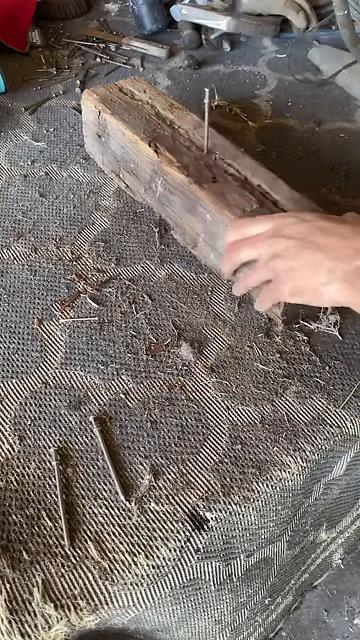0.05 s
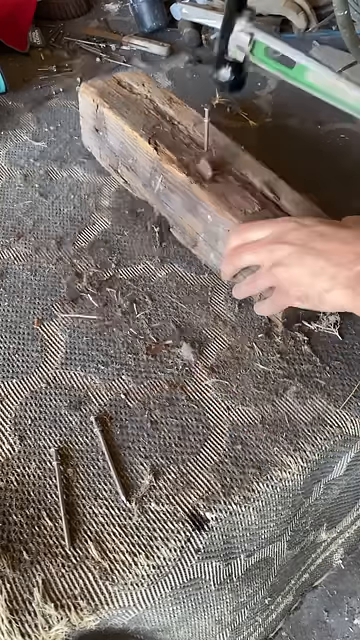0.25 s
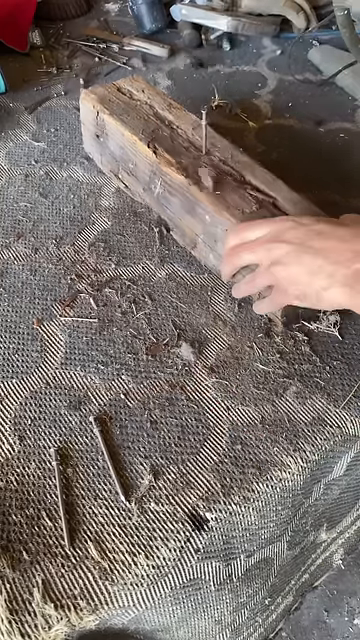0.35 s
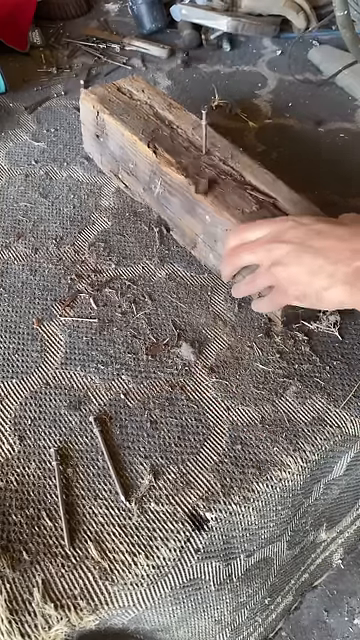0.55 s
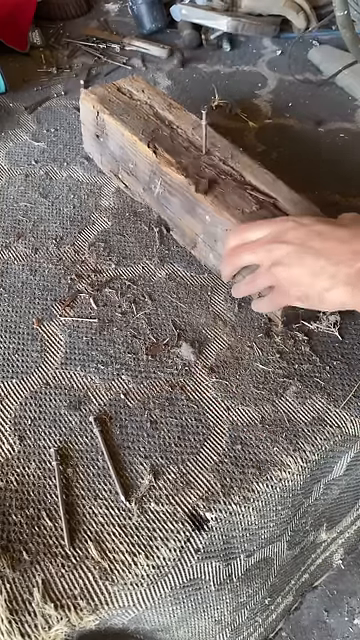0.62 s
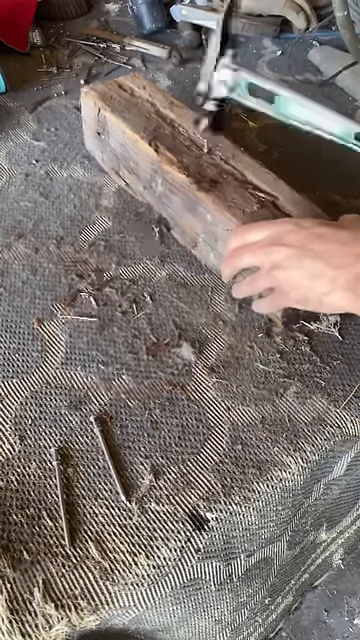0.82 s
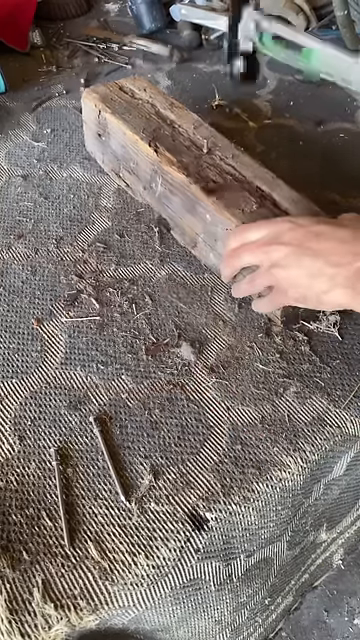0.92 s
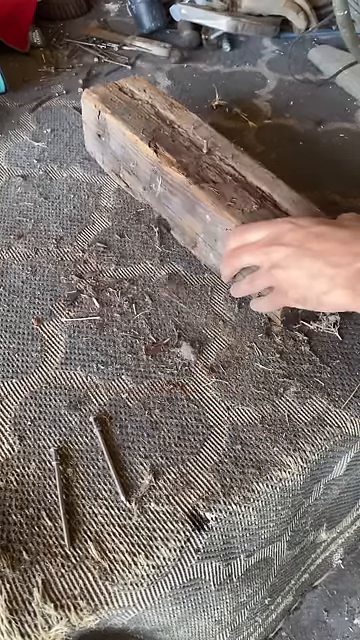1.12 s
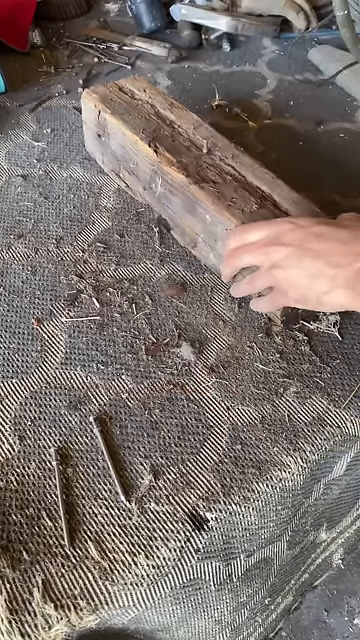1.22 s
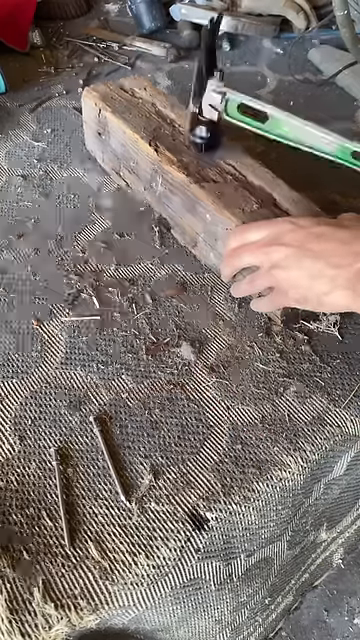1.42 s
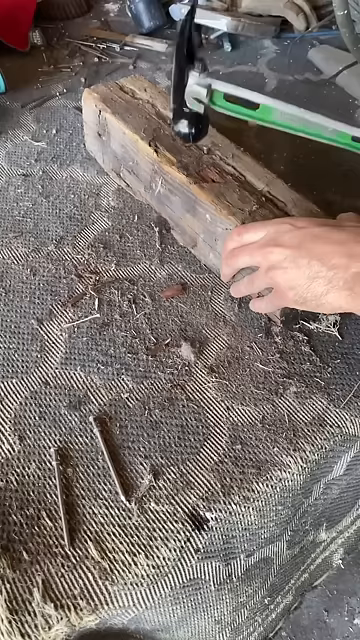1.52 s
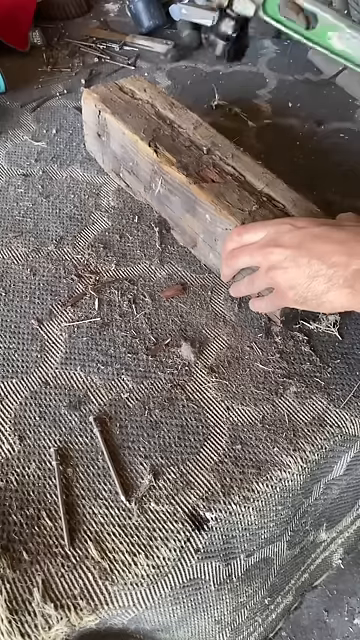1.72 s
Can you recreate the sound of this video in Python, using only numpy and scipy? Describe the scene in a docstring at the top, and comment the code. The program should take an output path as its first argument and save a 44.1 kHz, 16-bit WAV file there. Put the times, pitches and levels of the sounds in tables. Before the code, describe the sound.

A hammer hits a nail into a wooden block three times, at about 0.2, 0.8 and 1.4 seconds, close by in a quiet workshop. Each blow is a sharp steel crack with a wooden knock, a low bench boom and a brief room ring. Loose nails jingle faintly near 0.4 and 1.0 seconds, cloth swishes softly between swings, and things on the bench settle around 1.6 seconds.

```python
"""A workshop, close to a cloth-covered bench: a hammer drives a nail into a wooden block, three blows.
Each blow is a short scuff, a steel crack, a knock of the block and a boom of the bench;
the room rings after it. Loose nails jingle, things on the bench settle, a chip ticks.
The hand scrapes the block and the arm swishes faintly over the quiet of the room."""
import sys
import numpy as np
from scipy import signal
from scipy.fft import rfft, irfft
from scipy.io import wavfile
from scipy.ndimage import uniform_filter1d

SR = 44100
rng = np.random.default_rng(int(sys.argv[2]) if len(sys.argv) > 2 else 0)


def wav_record(signal):
    """Record a signal, one row per channel, as 16-bit PCM in the file named by sys.argv[1]."""
    frames = np.transpose(np.atleast_2d(signal))
    bounded = np.clip(frames, -1, 1)
    # unit amplitude maps onto the largest positive 16-bit level
    quanta = np.round(bounded * 32767).astype(np.int16)
    wavfile.write(sys.argv[1], SR, quanta)


N = 77175
T, HZ = np.arange(N) / SR, np.fft.rfftfreq(N, 1 / SR)
TOP_HZ = 16400
MIC_DELAY_S = np.array([[0], [0.00002]])  # left, right
# microphone pair (frequency [Hz], correlation [-1..1], left minus right [dB])
MIC_PAIR = [(100.4, 0.94, 0.1), (280, 1, -2.9), (652, 0.17, 0.5), (1494, 0.2, 1), (2880, 0.07, 2),
            (5520, 0, -1), (10300, 0.14, 0.5), (15140, -0.1, -2.3)]


def amp(db):
    """Decibels to gain."""
    return 10 ** (np.asarray(db) / 20)


def read(table, hz, column=1):
    """Table column interpolated over log frequency."""
    columns = np.transpose(table)
    return np.interp(np.log(hz + 1), np.log(columns[0] + 1), columns[column])


def add(mix, start_s, sound):
    """Mix a sound in at start_s."""
    part = mix[:, round(start_s * SR):][:, :sound.shape[1]]
    part += sound[:, :part.shape[1]]


def noise(spectrum, tilt_db_oct=0):
    """Partly correlated stereo noise: shaped, scaled to unit rms, then tilted above 500 Hz."""
    a, b = rfft(rng.standard_normal((2, N)))
    correlation = np.clip(read(MIC_PAIR, HZ), -1, 1)
    mid, side = a * np.sqrt((1 + correlation) / 2), b * np.sqrt((1 - correlation) / 2)
    colour = amp(read(spectrum, HZ))
    colour /= np.sqrt(np.mean(colour ** 2))
    colour *= amp(tilt_db_oct * np.log2(np.maximum(HZ, 500) / 500))
    return irfft(np.array([mid + side, mid - side]) * colour * (HZ < TOP_HZ), N)


def burst(spectrum, db, decay_s):
    """Noise with sudden onset and exponential decay."""
    return amp(db) * noise(spectrum) * np.exp(-T / decay_s)


def ring(modes, gain_db=0, rise_cycles=0.4, delay_500hz_s=0):
    """Struck modes; low ones build up more slowly and, if delayed, arrive later."""
    t, out = T - MIC_DELAY_S, np.zeros((2, N))
    for k, ((hz, db, t60_s), extra_db) in enumerate(zip(modes, gain_db + np.zeros(len(modes)))):
        age_s = np.maximum(t[:, :int(2 * t60_s * SR)] - delay_500hz_s * np.sqrt(500 / hz), 0)
        rise = 1 - np.exp(-age_s * hz / rise_cycles)
        fall = amp(db + extra_db - 60 * age_s / t60_s)
        out[:, :age_s.shape[1]] += (-1) ** k * fall * rise * np.sin(2 * np.pi * hz * age_s)
    return out


def room_tone():
    """Steady quiet of the workshop; a low rumble dies away at the start."""
    # spectra (frequency [Hz], density [dB])
    floor = [(25, -12), (60, 0), (140, -5), (250, -16), (450, -23), (1000, -31), (3000, -30), (5500, -32),
             (7500, -46), (10000, -39), (16000, -48)]
    rumble = [(25, -11), (60, -1), (140, -8), (250, -17.5), (500, -24.5), (1200, -33), (4000, -26.5),
              (8000, -46), (16000, -55)]
    return amp(-54) * noise(floor) + burst(rumble, db=-47.5, decay_s=0.27)


def arm():
    """Cloth swishes as the arm swings; the block scrapes once under the hand."""
    # swings (centre [s], sigma [s], level [dB])
    swings = [(0.23, 0.052, -51), (0.501, 0.039, -51.5), (0.756, 0.1, -54), (0.982, 0.084, -54),
              (1.316, 0.12, -62)]
    # spectra (frequency [Hz], density [dB])
    cloth = [(300, -4), (1200, -10), (2600, 1), (5000, -2), (7500, -22), (10000, -9.5), (16000, -23.5)]
    scrape = [(3500, -26), (4400, 0), (5000, -3), (6000, -30)]

    def swell(centre_s, sigma_s, db):
        return amp(db) * np.exp(-((T - centre_s) / sigma_s) ** 2 / 2)

    swishes = noise(cloth) * sum(swell(*swing) for swing in swings)
    return swishes + noise(scrape) * swell(centre_s=0.12, sigma_s=0.022, db=-56.5)


def scuff(length_s, db):
    """Grainy scuff swelling into the crack."""
    # spectrum (frequency [Hz], density [dB])
    spectrum = [(100, -6), (500, 4), (1200, 0.5), (2500, -3), (6000, -14.5), (10000, -26), (16000, -32.5)]
    size, grain_db = round(length_s * SR), 4.5
    grains = uniform_filter1d(rng.standard_normal(N), size=40)
    swell = np.linspace(0, 1, size) ** 0.89
    return swell * (amp(db + grain_db * grains / grains.std()) * noise(spectrum))[:, :size]


def crack(blow, db):
    """Steel hits steel."""
    # spectra (frequency [Hz], density in blow 0, 1, 2 [dB])
    spectra = [(502, -12, 1, -7.5), (1850, 5, 1, 17.5), (2950, -10, 7, -23), (5400, 9, -9, -12.5),
               (7000, -5.5, -9, -36), (9700, -14.5, 9, 1.5), (10260, 17.5, -10, 1.5), (11900, -17, 4, -7),
               (13300, -5, -5, 4), (15970, -2, 3.5, 2)]
    return burst(np.array(spectra)[:, [0, blow + 1]], db, decay_s=0.00069)


def rasp(db, decay_s):
    """The nail rasps through wood fibres."""
    # spectrum (frequency [Hz], density [dB])
    fibres = [(200, -12.5), (700, 8.5), (1800, 6), (3000, -6.5), (5000, 1.5), (7500, -27.5), (10500, 4),
              (13000, -27), (16000, -14)]
    return burst(fibres, db, decay_s)


def steel_ring(db, shank_hz, shimmer_db):
    """Head and nail ring, the free shank only briefly; the head shimmers on."""
    # modes (frequency [Hz], level [dB], t60 [s])
    head_and_nail = [(2410, -30.5, 0.45), (3075, -41, 0.075), (3795, -51.5, 0.45), (9280, -45.5, 0.3),
                     (10900, -30.5, 0.051)]
    shimmer = [(969, -43, 0.6), (3795, -63, 1.0), (9060, -62, 1.3), (9216, -60, 1.3), (9400, -65, 1.2),
               (9630, -63, 1.2)]
    shank = [(shank_hz, -16, 0.0076)]
    return amp(db) * ring(head_and_nail) + ring(shank) + amp(shimmer_db) * ring(shimmer)


def bending_wave(colour, travel_s):
    """First wave through block and bench; delay goes as 1/sqrt(frequency), so it sweeps down."""
    # spectrum (frequency [Hz], density [dB])
    spectrum = [(20, -30.5), (60, -11.5), (100, 3), (180, 3.5), (300, -7.5), (600, -11.5), (1000, -17),
                (1800, -33.5), (3500, -45), (8000, -67)]
    phase_turns = 2 * travel_s * np.sqrt(500 * HZ) + HZ * MIC_DELAY_S
    magnitude = amp(36 + read(spectrum, HZ) + read(colour, HZ))
    return irfft(magnitude * np.exp(-2j * np.pi * phase_turns), N)[:, :SR // 10]


def block_knock(colour, travel_s):
    """The block's modes start partway through the bending wave's travel."""
    # modes (frequency [Hz], level [dB], t60 [s])
    modes = [(173.2, -4.5, 0.084), (237, -14.5, 0.054), (320, -30, 0.017), (406, -27.5, 0.019),
             (437, -48.5, 0.21), (504.3, -20, 0.094), (591, -11.5, 0.061), (660, -11.5, 0.028),
             (888, -27.5, 0.035), (957, -23.5, 0.066), (1128, -18.5, 0.026), (1564, -27.5, 0.03),
             (1706, -12, 0.022), (2896, -23, 0.028)]
    return ring(modes, read(colour, np.transpose(modes)[0]), delay_500hz_s=0.614 * travel_s)


def bench_boom(db):
    """Low modes of the bench."""
    # modes (frequency [Hz], level [dB], t60 [s])
    modes = [(57.7, -15, 0.16), (92.1, -9, 0.068), (109.9, -21.5, 0.18)]
    return amp(db) * ring(modes)


def standing_waves(db):
    """Room modes build up slowly and hum on."""
    # modes (frequency [Hz], level [dB], t60 [s])
    modes = [(60.1, -25.5, 0.7), (68.6, -19, 1), (171, -35, 0.89)]
    return amp(db) * ring(modes, rise_cycles=38)


def echoes(near_db, far_db, tilt_db_oct):
    """Dense reflections rise, sag during a hold, then decay at a rate set by frequency."""
    # reverberation (frequency [Hz], density [dB], t60 [s])
    near = [(40.3, -5, 0.17), (151, 4, 0.17), (385, -4, 0.52), (930, -12.5, 0.21), (2420, -18, 0.37),
            (6210, -22, 0.29), (7530, -59, 0.12), (8600, -23.5, 0.27), (12200, -25.5, 0.24),
            (13500, -33, 0.23), (16000, -32.5, 0.31)]
    far = [(29.8, -8, 2.1), (63.6, 0.5, 1.9), (133, 0, 0.85), (269, -4.5, 0.81), (509, -8, 0.72),
           (1270, -20.5, 0.61), (4520, -29, 0.29), (6100, -36.5, 1.1), (7800, -75, 0.5),
           (8250, -37.5, 0.94), (12000, -44, 1.4), (16000, -55, 0.48)]

    def tail(bands, db, rise_s, hold_s, sag_db_per_s):
        hz, t, frames = signal.stft(noise(bands, tilt_db_oct), SR, nperseg=512)
        t60_s = read(bands, hz, column=2)[:, None]
        frames *= amp(db - sag_db_per_s * np.minimum(t, hold_s) - 60 * np.maximum(t - hold_s, 0) / t60_s)
        return signal.istft(frames, SR, nperseg=512)[1][:, :N] * (1 - np.exp(-T / rise_s))

    return (tail(near, near_db - 15.5, rise_s=0.0022, hold_s=0.064, sag_db_per_s=108.5)
            + tail(far, far_db - 28, rise_s=0.087, hold_s=0.23, sag_db_per_s=20.5))


def hammer():
    """Each blow excites nail, block, bench and room."""
    # blows (time [s], scuff length [s], scuff [dB], crack [dB], rasp [dB], rasp decay [s], steel [dB],
    # shimmer [dB], shank [Hz], wave travel at 500 Hz [s], bench [dB], standing waves [dB],
    # near echo [dB], far echo [dB], echo tilt [dB/octave])
    blows = [(0.2231, 0.012, -22, -3.5, -14, 0.0051, -11.5, 2, 4840, 0.006168, 6, 9, -3.5, -1, -0.5),
             (0.8057, 0.011, -22, -4.5, -18.5, 0.0044, -13.5, -2, 5450, 0.004897, 4.5, 3, -6.5, -6, -0.5),
             (1.4128, 0.016, -25.5, -0.5, -14, 0.0028, -17, 2.5, 5370, 0.00382, -0.5, -2.5, -2, -2.5, -2.03)]
    # drive on the block: bands (frequency [Hz]), then one row per blow (gain in each band [dB])
    drive_hz = (175, 380, 560, 700, 900, 1700)
    drive_db = [(-1.5, 7.5, 3, -0.72, 2.5, 1), (-8.5, 8.5, -21.5, 0.47, -8.5, -4),
                (-0.5, -14, 0, 1, 2, -7.5)]
    out = np.zeros((2, N))
    for k, (s, scuff_s, scuff_db, crack_db, rasp_db, rasp_s, steel_db, shimmer_db, shank_hz, travel_s,
            bench_db, hum_db, near_db, far_db, tilt_db_oct) in enumerate(blows):
        colour = list(zip(drive_hz, drive_db[k]))
        add(out, s - scuff_s, scuff(scuff_s, scuff_db))
        add(out, s, crack(k, crack_db) + rasp(rasp_db, rasp_s))
        add(out, s, steel_ring(steel_db, shank_hz, shimmer_db))
        add(out, s, bending_wave(colour, travel_s))
        add(out, s, block_knock(colour, travel_s))
        add(out, s + travel_s, bench_boom(bench_db) + standing_waves(hum_db))
        add(out, s + 0.051, bench_boom(bench_db - 6))  # the top drops back on its frame
        add(out, s, echoes(near_db, far_db, tilt_db_oct))
    return out


def loose_things():
    """Spare nails jump on the cloth, things settle, a wood chip shifts with a tick."""
    # events (time [s], level [dB], tilt [dB/octave])
    jingles = [(0.396, -57, 7.5), (0.992, -50.5, -2.5)]
    settles = [(0.445, -32.5, -2.5), (0.632, -33, -16), (1.612, -33.5, -1.5), (1.640, -31, 0)]
    # modes (frequency [Hz], level [dB], t60 [s])
    nail_modes = [(3805, 0.5, 0.17), (5900, 0, 0.054), (6660, -9, 0.24), (10200, -2, 0.053),
                  (10400, 3, 0.15), (12980, -14, 0.27), (15400, -12, 0.04)]
    settle_modes = [(145.2, -1, 0.2), (238.4, 6.5, 0.11), (410, -9.5, 0.2), (796, -17, 0.2),
                    (900, -13.5, 0.21)]
    # tick spectrum (frequency [Hz], density [dB])
    chip = [(500, -37), (2800, 24), (5500, -17.5), (9000, -26), (16000, -35)]
    out = np.zeros((2, N))
    for events, modes in ((jingles, nail_modes), (settles, settle_modes)):
        octaves = np.log2(np.transpose(modes)[0] / modes[0][0])
        for s, db, tilt_db_oct in events:
            add(out, s, ring(modes, db + tilt_db_oct * octaves))
    add(out, 0.66, burst(chip, db=-46, decay_s=0.003))
    return out


def scene():
    """Blows, small movements and the quiet room."""
    return hammer() + loose_things() + arm() + room_tone()


def record(dry):
    """Microphone balance, soft overload, band limit."""
    balance_db = read(MIC_PAIR, HZ, column=2)
    balanced = irfft(rfft(dry) * amp(np.array([balance_db, -balance_db]) / 2), N)
    clipped = balanced / (1 + (balanced / 0.9) ** 6) ** (1 / 6)
    lowpass = signal.firwin(255, TOP_HZ, window=("kaiser", 9), fs=SR)
    return signal.oaconvolve(clipped, lowpass[None], "same")


dry = scene()
out = record(dry)
wav_record(out)
```